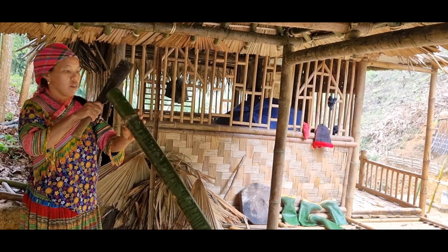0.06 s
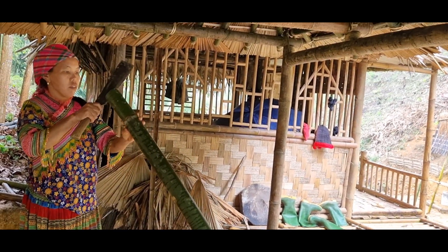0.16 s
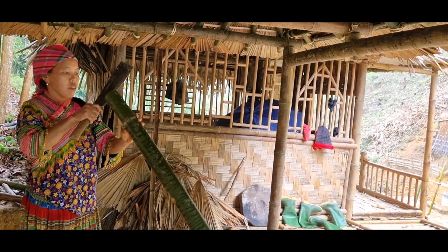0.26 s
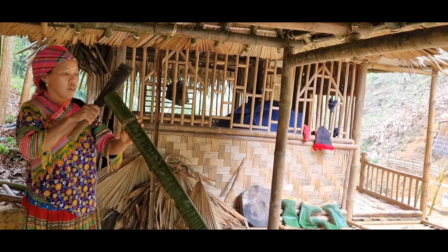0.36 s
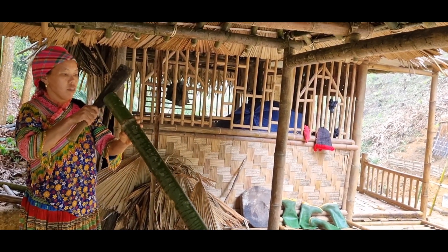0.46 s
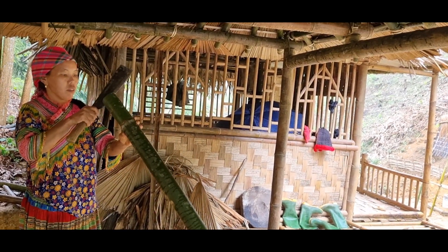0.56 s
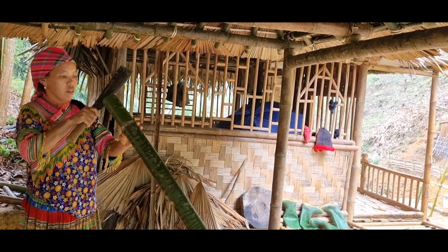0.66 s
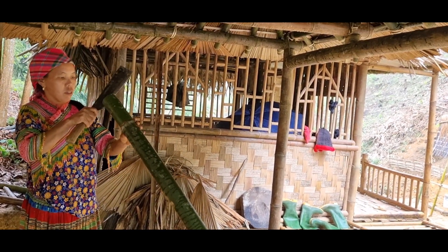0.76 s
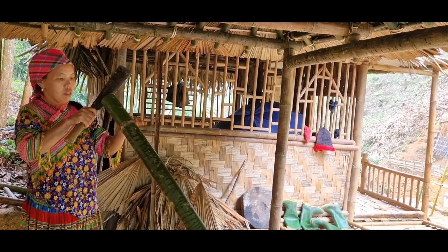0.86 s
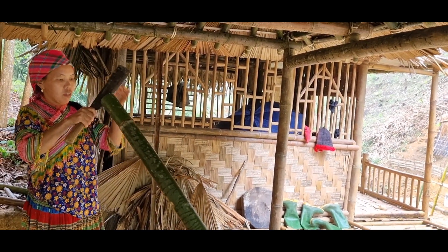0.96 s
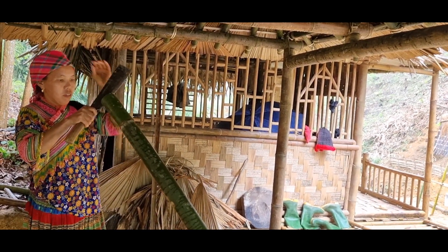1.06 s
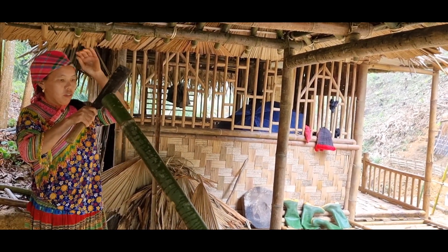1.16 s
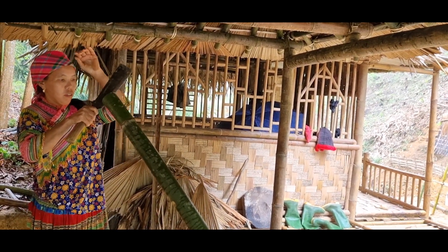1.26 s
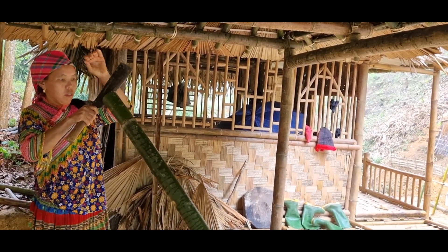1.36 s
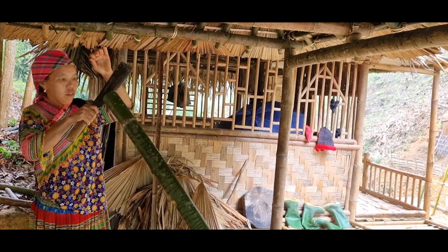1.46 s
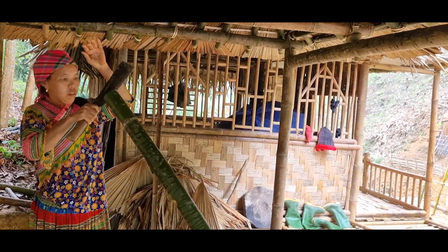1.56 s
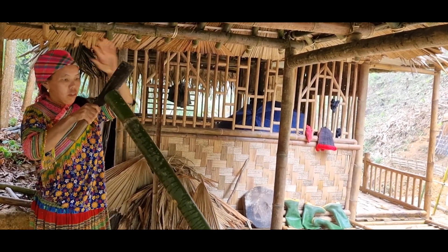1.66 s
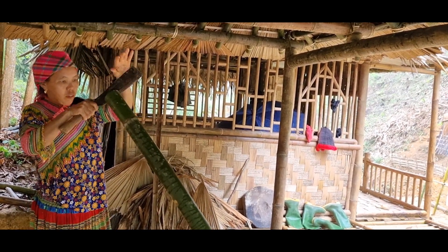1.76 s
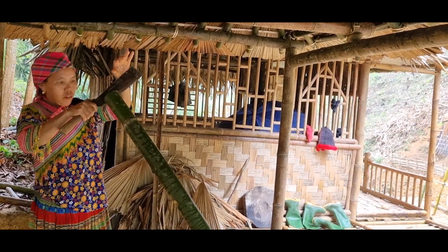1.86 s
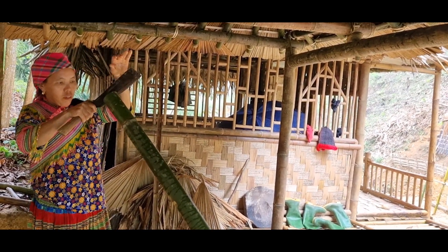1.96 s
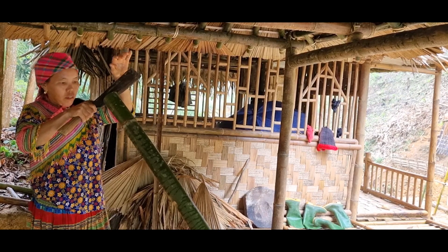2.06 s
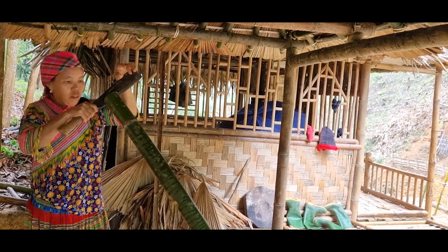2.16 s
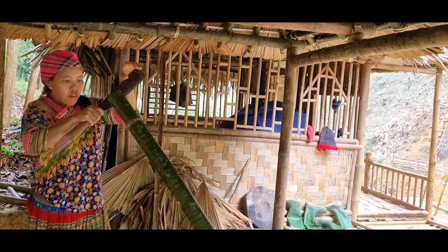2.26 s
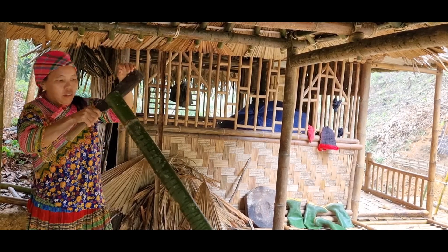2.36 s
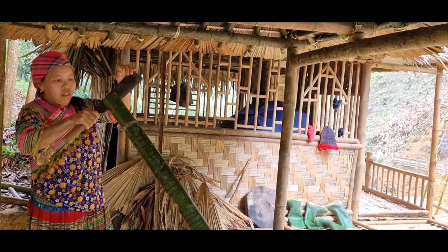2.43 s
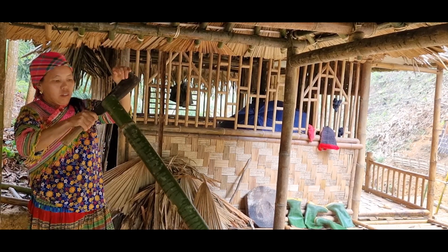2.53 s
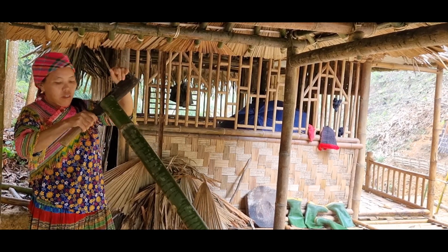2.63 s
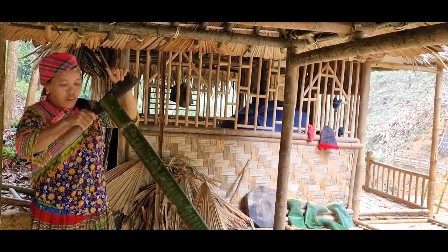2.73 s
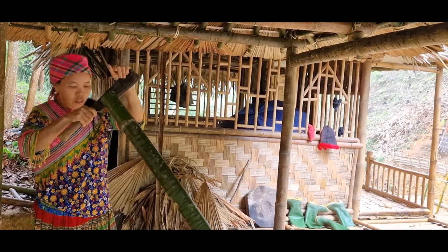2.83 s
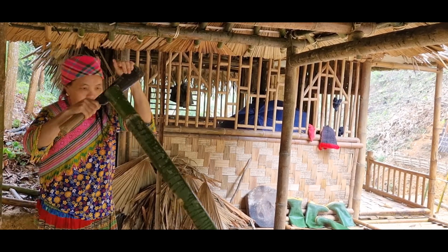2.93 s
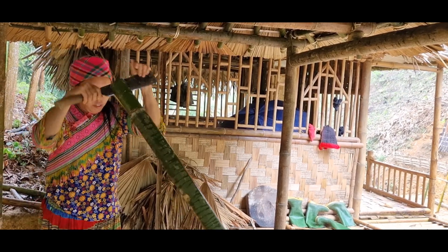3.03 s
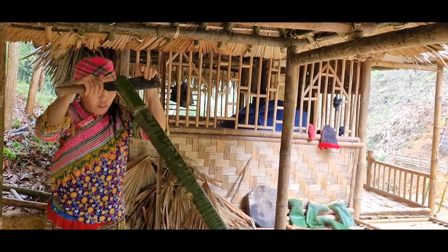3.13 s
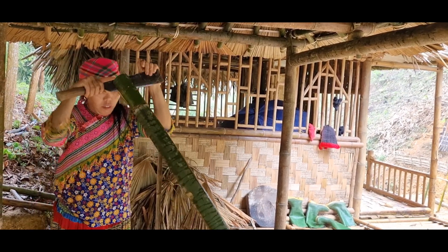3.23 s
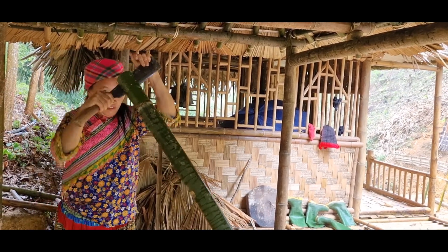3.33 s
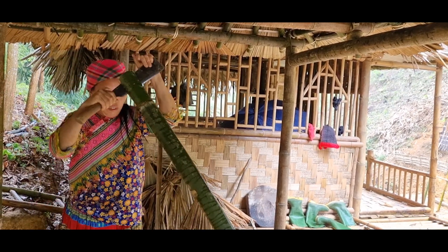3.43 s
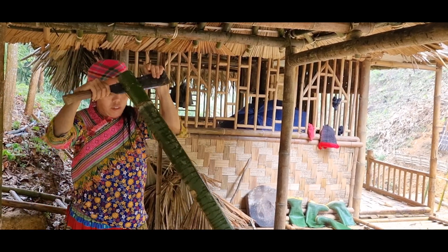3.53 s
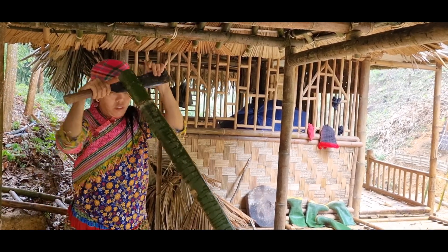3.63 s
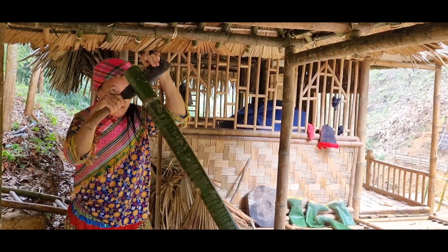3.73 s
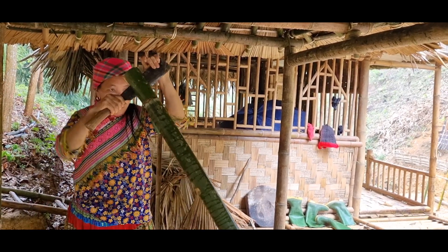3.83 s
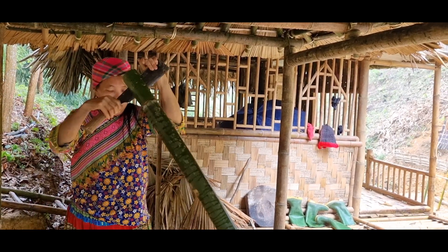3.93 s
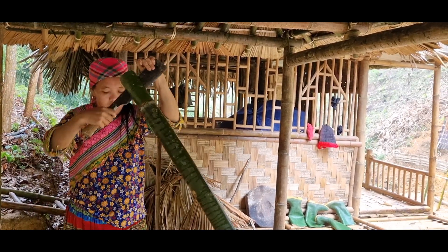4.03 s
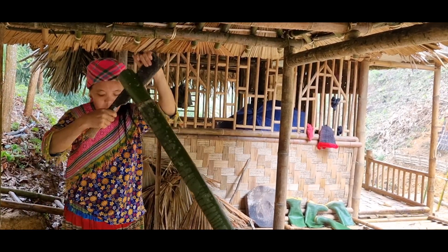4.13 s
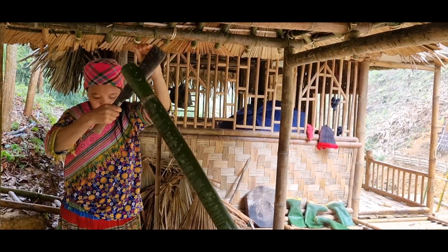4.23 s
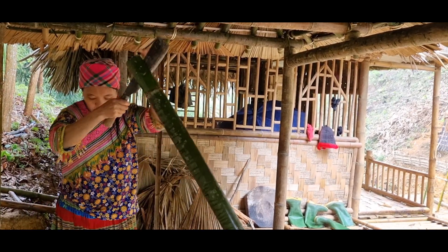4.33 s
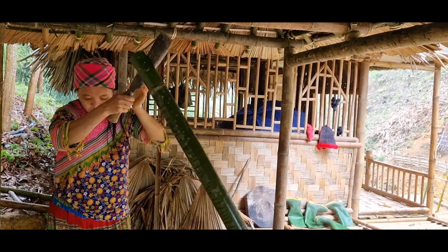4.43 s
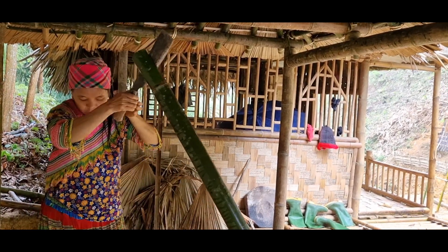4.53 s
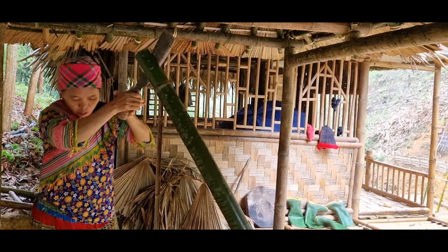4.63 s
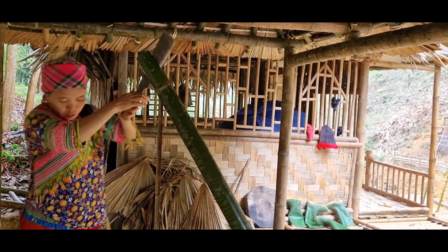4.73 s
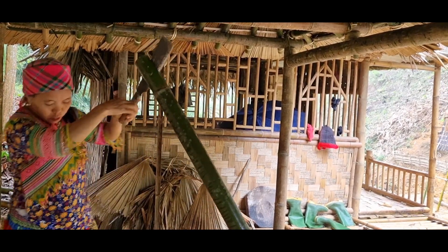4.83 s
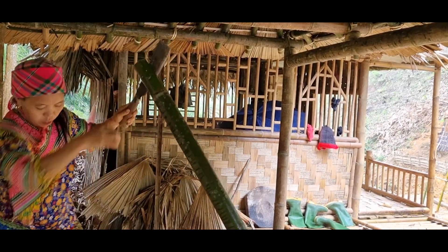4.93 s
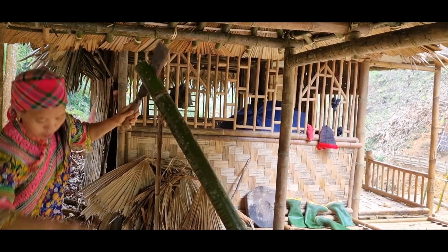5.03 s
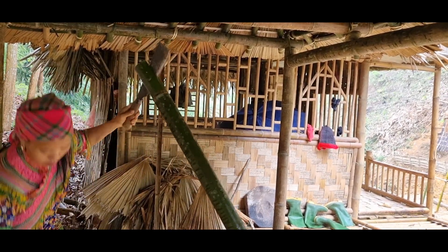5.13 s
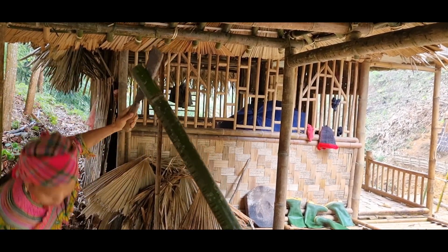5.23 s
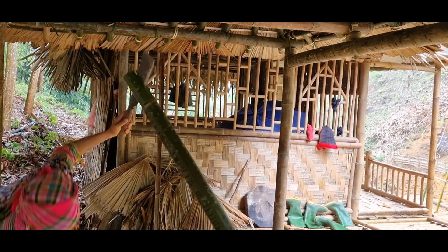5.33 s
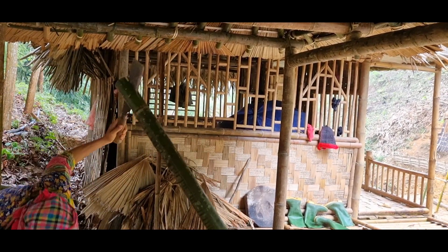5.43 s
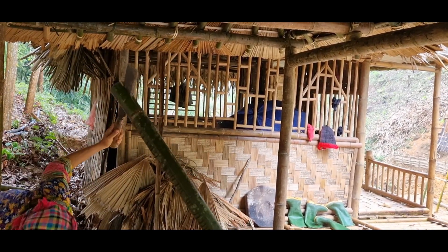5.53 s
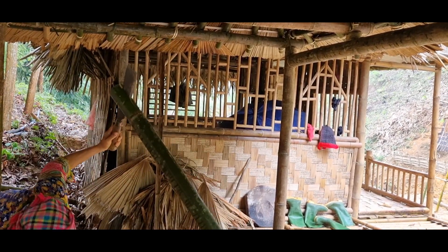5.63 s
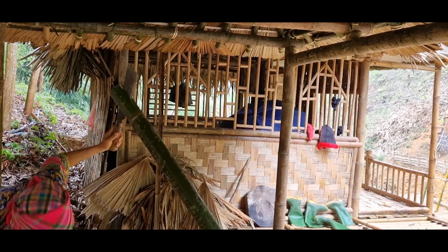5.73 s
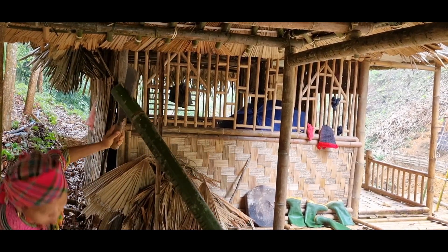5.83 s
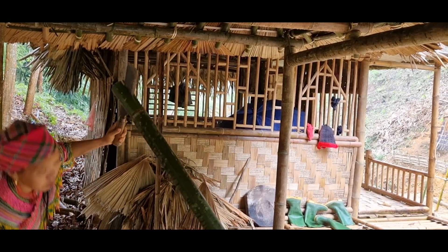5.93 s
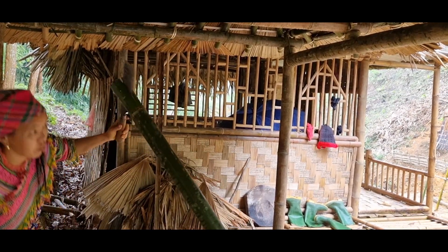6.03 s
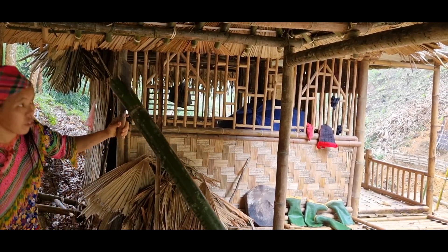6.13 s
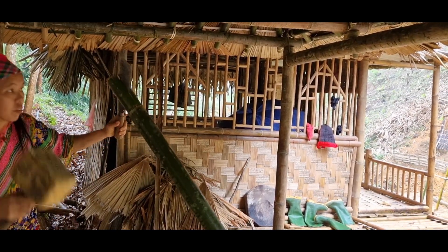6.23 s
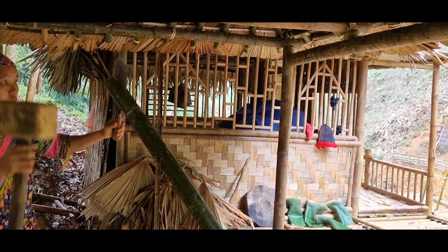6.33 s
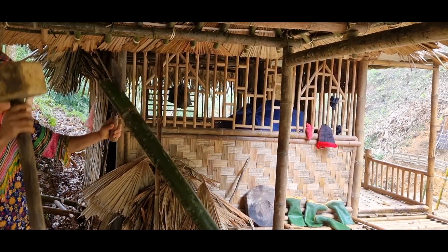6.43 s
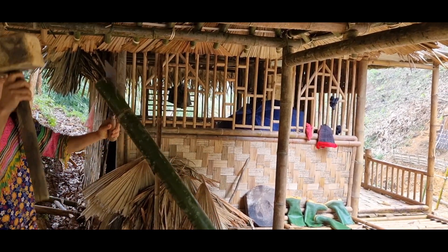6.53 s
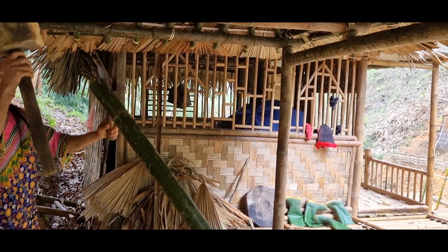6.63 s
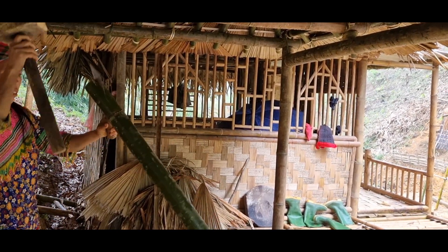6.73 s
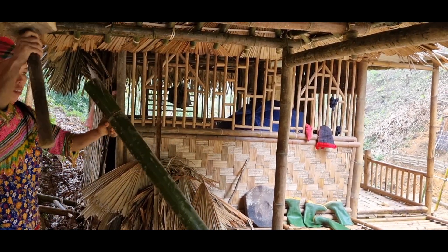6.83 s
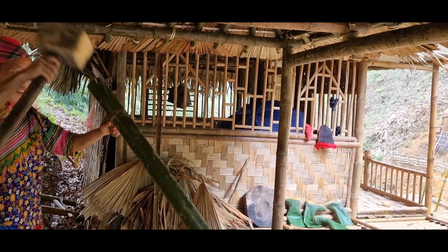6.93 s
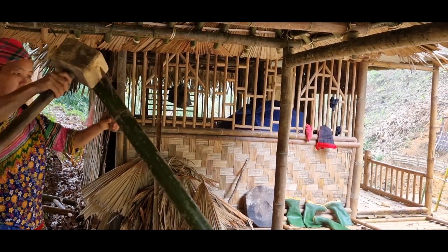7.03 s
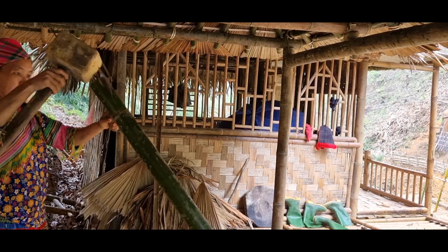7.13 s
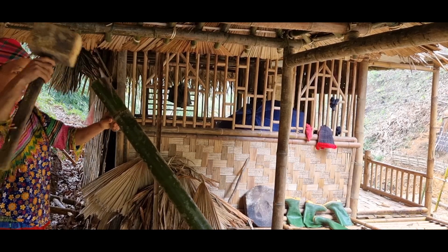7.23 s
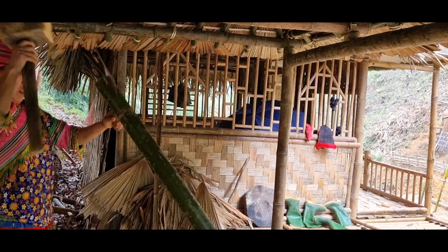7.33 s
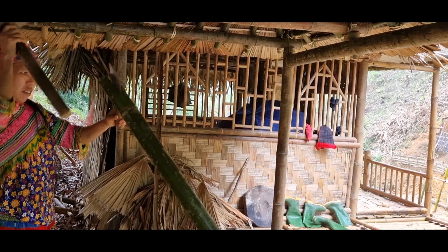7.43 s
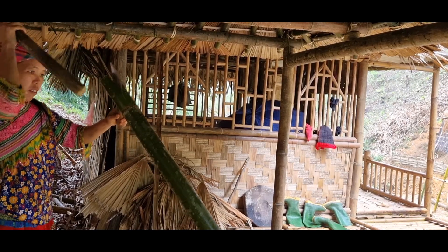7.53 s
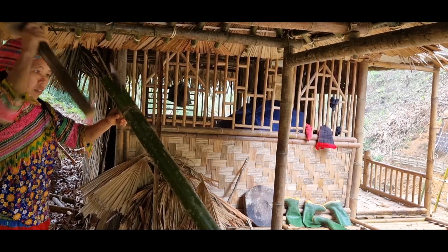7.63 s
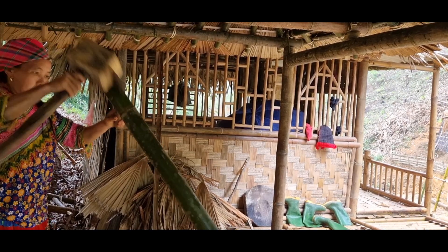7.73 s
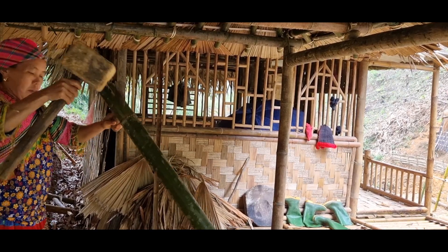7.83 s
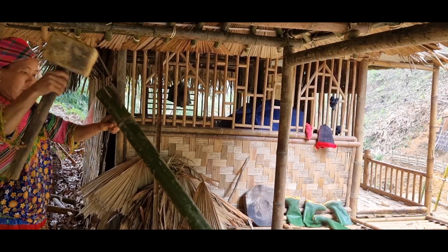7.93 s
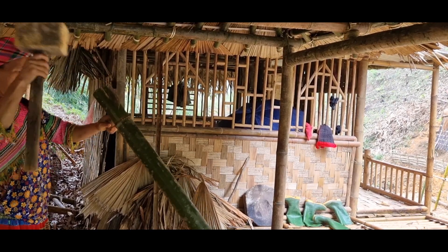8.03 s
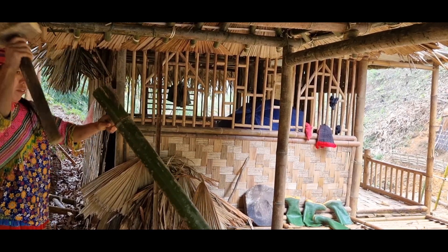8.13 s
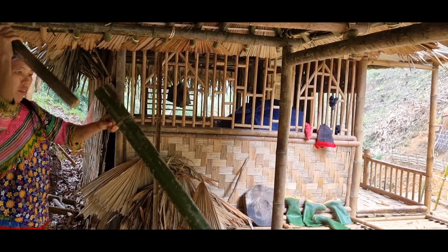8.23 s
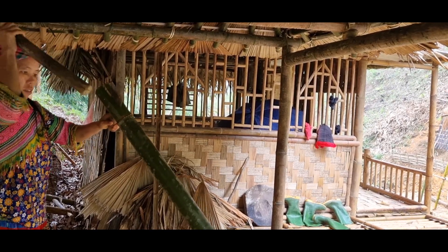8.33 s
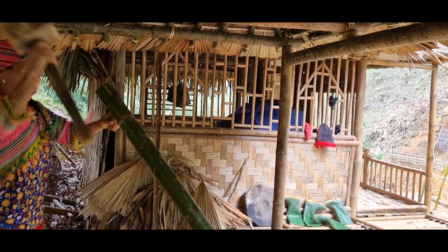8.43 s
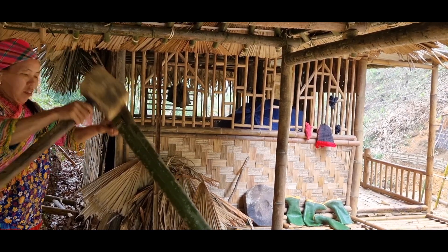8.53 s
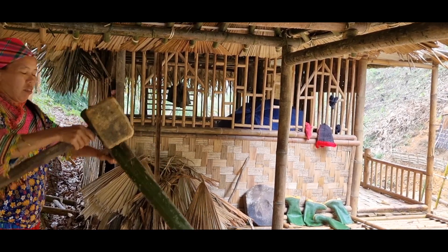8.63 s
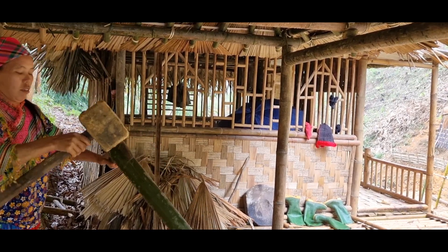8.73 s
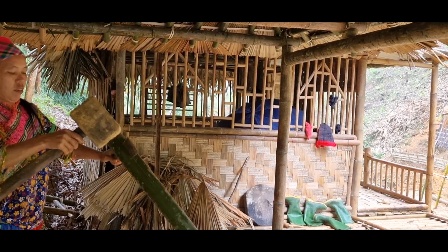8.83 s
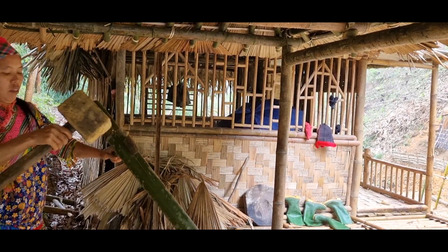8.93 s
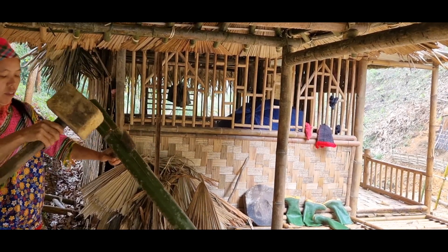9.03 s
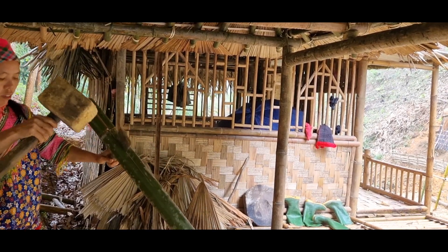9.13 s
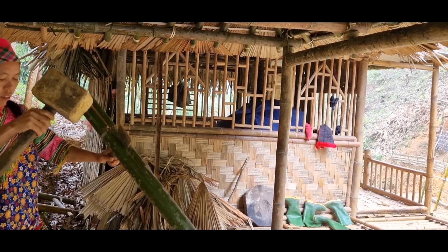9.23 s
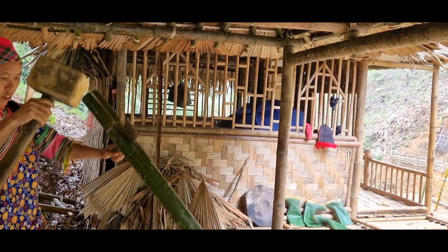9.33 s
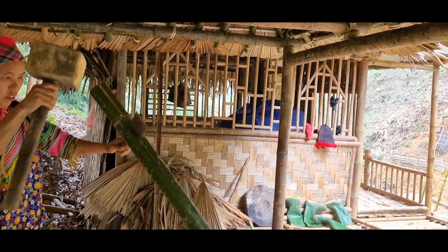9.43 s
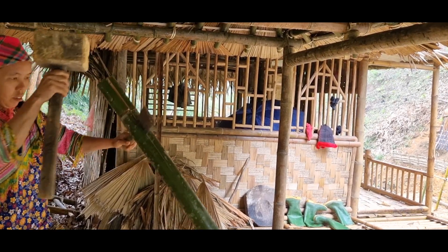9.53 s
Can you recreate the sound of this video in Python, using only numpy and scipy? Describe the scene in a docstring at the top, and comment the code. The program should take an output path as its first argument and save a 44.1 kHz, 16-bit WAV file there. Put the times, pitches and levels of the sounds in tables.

```python
"""Soft air, low rumble and a narrow hiss of distant insects (filtered noise) come first, then feet and small snaps.
A green bamboo pole leaning on the porch of a thatched hut is split with a knife: fibres tear (click runs through
modes), steel squeals and the halves creak (stick-slip tones). Cloth rustles (swelling noise). A wooden mallet then
drives the blade, shaking frame and dry palm leaves (decaying noise), and groans along the pole."""
import sys
import numpy as np
from scipy import signal
from scipy.io import wavfile
from scipy.ndimage import uniform_filter1d

SR = 44100
rng = np.random.default_rng(int(sys.argv[2]) if len(sys.argv) > 2 else 0)


def unload_wav(signal):
    """Save mono or channel-first audio to the path in sys.argv[1] as 16-bit WAV at rate SR, clipped to [-1, 1]."""
    wavfile.write(
        sys.argv[1],
        SR,
        np.round(np.clip(np.atleast_2d(signal).T, -1, 1) * 32767).astype(np.int16),
    )


N = 422478
TIME = np.arange(N) / SR
RING_TIME = TIME[:SR // 3]


def amp(db):
    """Decibels to amplitude gain."""
    return 10 ** (np.asarray(db) / 20)


def unit(x):
    """Scale each channel to energy 1."""
    return x / np.sqrt(np.sum(x ** 2, axis=-1, keepdims=True) + 1e-20)


def at_hz(points, hz):
    """Interpolate a spectrum on a log-frequency axis."""
    f, value = np.transpose(points)
    return np.interp(np.log(hz), np.log(f), value)


def band(x, low_hz, high_hz):
    """Causal Butterworth band-pass."""
    edges_hz = [low_hz, min(high_hz, SR / 2 - 500)]
    return signal.sosfilt(signal.butter(2, edges_hz, "band", fs=SR, output="sos"), x + 1e-18)


def pan(db):
    """Left and right gains for a left-right difference in dB."""
    return amp([[db / 2], [-db / 2]])


def add(out, s, x):
    """Mix a stereo sound in at time s."""
    start = round(s * SR)
    out[:, start:start + x.shape[1]] += x[:, :N - start]


def flutter(per_s, size=N):
    """Random wander: normal draws of spread 1 at per_s knots a second, linear between."""
    return np.interp(TIME[:size] * per_s, np.arange(4000), rng.standard_normal(4000))


def dying(t, t60):
    """Exponential decay, 60 dB in t60 seconds."""
    return np.exp(-np.log(1000) * t / t60)


# Left-right likeness: (f/Hz, correlation)
LIKENESS = [(60, .96), (300, .94), (600, .7), (1100, .25), (2500, .1), (5000, 0), (15000, 0)]


def likeness(hz):
    """Left-right correlation: near 1 in the bass, 0 in the treble."""
    return np.clip(at_hz(LIKENESS, hz), -1, 1)


def noise(spectrum, size, t60=None):
    """Stereo noise in half octaves, alike in the bass; with t60 each band dies at its own pace."""
    out = 0
    edges_hz = 22 * 2 ** np.arange(0, 10, .5)
    white = rng.standard_normal((2, 2, size))
    for k, (low, high) in enumerate(zip(edges_hz, edges_hz[1:])):
        hz = np.sqrt(low * high)
        mid, side = band(white[k % 2], low, high)
        alike = likeness(hz)
        fade = 1 if t60 is None else amp(-60 * TIME[:size] / at_hz(t60, hz))
        stereo = np.sqrt(1 + alike) * mid + np.sqrt(1 - alike) * side * [[1], [-1]]
        out = out + amp(at_hz(spectrum, hz)) * fade * stereo
    return unit(out)


def steady(spectrum):
    """Noise over the whole scene, rms 1 per channel."""
    return noise(spectrum, size=N) * np.sqrt(N)


# Spectra of moving air and low rumble: (f/Hz, relative density/dB per Hz)
AIR = [(25, -15), (90, -3), (150, -7.5), (300, -12.5), (700, -7), (1500, -7.5), (3500, -8), (5000, -10),
       (7500, -9.5), (10000, -20.5), (15000, -14)]
RUMBLE = [(25, -18), (45, -4), (70, -1), (110, -0.5), (170, -16.5), (400, -31)]
# Rumble course: (t/s, level/dB before rumble_db is added)
RUMBLE_LEVEL = [(0.0, -88.5), (2.29, -67.5), (2.48, -77), (3.63, -66.5), (4.16, -77.5), (4.86, -69.5),
                (8.03, -73.5), (8.32, -77.5), (9.58, -76)]
INSECT_HZ, INSECT_WIDTH_HZ = 5587, 440
# initial levels of air and insects; both ebb
AIR_DB, INSECTS_DB, EBB_DB_PER_S = -58.5, -59.5, 0.22


def outdoors(stir_db=1.27, rumble_db=3):
    """Soft moving air, a low rumble and a narrow noise band of distant insects."""
    air = steady(AIR) * amp(AIR_DB + stir_db * flutter(21))
    rumble = steady(RUMBLE) * amp(rumble_db + np.interp(TIME, *np.transpose(RUMBLE_LEVEL)))
    white = rng.standard_normal((2, N))
    chorus = band(white, INSECT_HZ - INSECT_WIDTH_HZ / 2, INSECT_HZ + INSECT_WIDTH_HZ / 2)
    insects = unit(chorus) * np.sqrt(N) * amp(INSECTS_DB)
    return (air + insects) * amp(-EBB_DB_PER_S * TIME) + rumble


# Dense wall modes and near reflections: (f/Hz, relative density/dB per Hz)
SCATTER = [(90, -4), (170, -19), (280, -13), (380, -16), (600, -1), (1400, 0), (2300, -5.5), (4000, -6.5),
           (8000, -7.5), (10500, -20), (15000, -20)]
# their decay: (f/Hz, t60/s)
SCATTER_T60 = [(100, 0.34), (500, 0.072), (1500, 0.089), (4000, .11), (14000, 0.11)]


def porch():
    """Five responses of dense wall modes and near reflections: decaying noise."""
    return [noise(SCATTER, size=len(RING_TIME), t60=SCATTER_T60) for _ in range(5)]


def ringing(modes, vary_db=2.5, detune=.018):
    """Modes with fresh strengths and shifted pitches; the higher ones reach the two ears out of step."""
    out = 0
    for hz, db, t60 in modes:
        skew = np.arccos(likeness(hz)) * rng.choice([-1, 1]) / 2
        pitch_hz = hz * (1 + detune * rng.standard_normal())
        phase = 2 * np.pi * pitch_hz * RING_TIME + skew * np.array([[1], [-1]])
        wave = np.sin(phase) * rng.choice([-1, 1])
        out = out + amp(db + vary_db * rng.standard_normal()) * unit(wave * dying(RING_TIME, t60))
    return unit(out)


def contacts(length, per_s, spread_db, fade_db, rise_s, first_db):
    """A first touch, then uneven clicks that swell as the stroke bites and weaken as it spends itself."""
    t = RING_TIME
    gaps = .5 + rng.exponential(1, len(t)) / 2
    born = np.cumsum(gaps) / per_s
    at = (born[born < min(length, t[-1])] * SR).astype(int)
    size_db = spread_db * np.clip(rng.standard_normal(len(t)), -2, 2)
    strength = amp(size_db) * rng.choice([-1, 1], len(t))
    clicks = np.zeros(len(t))
    clicks[at] = strength[:len(at)]
    clicks *= amp(-fade_db * np.minimum(t / length, 1)) * np.minimum(t / rise_s, 1)
    clicks[0] = amp(first_db)
    return clicks


# Edges of body, middle, edge and sizzle bands [f/Hz]
EDGES_HZ = [170, 500, 2000, 6000, 16000]
# Left-right lean of those four bands [dB, + = left]
LEAN_DB = [2, 0.056, 1.6, -2.9]
BODY_LOSS, SIZZLE_GAIN = 0.25, 1.5  # dB per dB of hardness; the edge rises 1 dB per dB


def strokes(table, colour_db, scatter, per_s, spread_db, fade_db, rise_s, first_db, direct_db,
            modes=None, modes_db=0):
    """Contact runs heard directly, through modes and off the porch; hardness sets the colour."""
    out = np.zeros((2, N))
    body_db, edge_db, sizzle_db = colour_db
    for s, length, db, hard_db in table:
        response = scatter[rng.integers(len(scatter))].copy()
        if modes:
            response += amp(modes_db) * ringing(modes)
        response[:, 0] += amp(direct_db)
        clicks = contacts(length, per_s, spread_db, fade_db, rise_s, first_db)
        sound = signal.fftconvolve(clicks[None], response, axes=1)
        bands_db = (body_db - BODY_LOSS * hard_db, 0, edge_db + hard_db, sizzle_db + SIZZLE_GAIN * hard_db)
        for low, high, band_db, lean_db in zip(EDGES_HZ, EDGES_HZ[1:], bands_db, LEAN_DB):
            part = unit(band(band(sound, low, high), low, high))
            add(out, s, part * amp(db + band_db) * np.sqrt(length * SR) * pan(lean_db))
    return out


# Feet and hands shift: (t/s, length/s, level/dB at 500-2000 Hz, hardness/dB)
SCUFFS = [(.112, 0.018, -55.5, -4), (1.987, 0.039, -51, -6), (4.385, 0.024, -60, 9),
          (4.831, 0.036, -46, -8), (5.055, 0.023, -46.5, -1.5), (5.09, 0.066, -47.5, 2.5),
          (5.347, .023, -47, 2), (5.483, .038, -51, -1.5), (6.246, 0.011, -46.5, 7.5)]
# (body, edge, sizzle) [dB re 500-2000 Hz, at hardness 0]
SCUFF_COLOUR_DB = (-14, -6, -11)


def scuffs(scatter):
    """Feet and hands shift: sparse contacts, no modes."""
    return strokes(SCUFFS, SCUFF_COLOUR_DB, scatter, per_s=900, spread_db=2.0, fade_db=6.5,
                   rise_s=.0024, first_db=8.0, direct_db=-9.5)


# Small dry snaps: (t/s, peak/dB before panning, centre f/Hz, left-right/dB)
SNAPS = [(.38, -40, 4300, -5), (.619, -14.5, 2610, -1), (.71, -38.5, 1940, 4), (.764, -22.5, 2580, -7.5),
         (.849, -31.5, 7640, -8), (.896, -36.5, 2500, -3), (1.109, -35, 1730, 3), (1.463, -30, 2200, 2.5),
         (2.537, -32.5, 6900, -1), (3.904, -27, 2870, 3.5), (4.698, -31.5, 1700, 4),
         (6.428, -21.5, 2040, 1), (6.453, -36, 1887, 4.5), (6.509, -26.5, 2000, 2), (6.53, -24, 2430, -0.5),
         (6.555, -33, 1670, 2), (7.306, -36, 8400, 1.5)]
# Modes of a thin bamboo strip: (f/Hz, level/dB, t60/s)
STRIP = [(503, -8.5, 0.013), (1058.5, 2.5, 0.063), (2010, -3, 0.01), (2605, -8.5, 0.029),
         (3200, -10.5, 0.019), (4530, 3.5, 0.015), (7610, -2, 0.089)]


def snaps(scatter, crack_t60=0.01, ring_db=-2, porch_db=-15, width=1.33, skirt_db=-12):
    """Single fibres and twigs give way: a very short noise crack and a ring of strip modes."""
    out = np.zeros((2, N))
    size = len(RING_TIME)
    for s, db, hz, lean_db in SNAPS:
        white = rng.standard_normal((2, size)) + rng.standard_normal(size) / 2
        crack = unit(white * dying(RING_TIME, crack_t60))
        ring = amp(ring_db) * ringing(STRIP, vary_db=7.0, detune=0.011)
        sound = crack + ring + amp(porch_db) * scatter[rng.integers(len(scatter))]
        sound = unit(band(sound, hz / width, hz * width) + amp(skirt_db) * band(sound, 300, 8000))
        add(out, s, sound / np.abs(sound).max() * amp(db) * pan(lean_db))
    return out


# The cleft runs on: (t/s, length/s, level/dB at 500-2000 Hz, hardness/dB)
SPLITS = [(1.79, 0.042, -28.5, 4), (1.836, 0.0071, -22.5, -0.5), (2.355, 0.028, -45, 5.5),
          (3.068, 0.0067, -34.5, 1.5), (3.105, .04, -42, 1), (3.141, 0.018, -21, -8.5),
          (3.161, 0.042, -19, -4), (3.331, 0.034, -32, 6), (3.37, 0.038, -35, 2.5), (3.415, 0.036, -26, -5),
          (3.542, 0.037, -50, 5.5), (3.568, 0.048, -42, 3), (3.748, 0.012, -24.5, 2.5),
          (3.764, 0.065, -31.5, 1), (3.83, 0.0069, -27, -8), (7.9432, .014, -17.5, 2.5)]
# (body, edge, sizzle) [dB re 500-2000 Hz, at hardness 0]
SPLIT_COLOUR_DB = (-19, -0.5, -5)
# Modes of the pole, also used by blows: (f/Hz, level/dB, t60/s)
POLE = [(257, -14.5, 0.23), (312.5, -10, 0.16), (472, -7, 0.08), (560, -14.5, 0.066), (667, 1, 0.052),
        (728.3, -6, 0.2), (807, 0, 0.13), (970, -7, 0.092), (1020, -3, 0.12), (1306, 1, .12),
        (1447, -1, 0.11), (1647, 1.5, 0.048), (2010, 3.5, 0.031), (2780, -17.5, 0.11), (2960, -18.5, 0.091),
        (3517, 0.5, 0.096), (3790, -5.5, .14), (4400, -17, .09), (7320, -5, .1)]


def splits(scatter):
    """Fibres tear as the cleft runs on: dense clicks through the pole's modes."""
    return strokes(SPLITS, SPLIT_COLOUR_DB, scatter, per_s=2200, spread_db=4.5, fade_db=6.5,
                   rise_s=0.0011, first_db=-4.5, direct_db=-12.5, modes=POLE, modes_db=-6.5)


# Jolts reaching the hut: (t/s, thud level/dB, leaves level/dB, leaves t60/s), levels before rise and decay
JOLTS = [(1.80, -46.5, -42.5, 0.58), (2.346, -50, -33, 0.17), (3.16, -58.5, -49, .98),
         (3.42, -59, -48.5, 1), (3.759, -54.5, -38.5, 0.77), (7.069, -41, -40.5, 0.67),
         (7.845, -35, -25.5, 0.37), (7.95, -66.5, -35, 0.4), (8.628, -36.5, -23.5, 0.5)]
# Spectra of frame and dry leaves: (f/Hz, relative density/dB per Hz)
FRAME = [(25, -27), (40, -8), (54, 1), (85, -8.5), (130, -12), (250, -18), (600, -46.5)]
LEAVES = [(200, -8), (800, 1.5), (2500, 0), (4200, 0.5), (8000, -4.5), (11000, -9.5), (15000, -8)]


def hut(frame_t60=0.3, rise_s=0.0061, crackle_db=2.0):
    """Each jolt sets the frame thudding and the dry palm leaves shivering: decaying noise."""
    thud, shiver = np.zeros(N), np.zeros(N)
    for s, thud_db, leaves_db, leaves_t60 in JOLTS:
        age = np.maximum(TIME - s, 0)
        rise = 1 - np.exp(-age / rise_s)
        thud += amp(thud_db) * rise * dying(age, frame_t60)
        shiver += amp(leaves_db) * rise * dying(age, leaves_t60)
    return thud * steady(FRAME) + shiver * amp(crackle_db * flutter(300)) * steady(LEAVES)


# Blade drags in the cleft: (t/s, length/s, level/dB at 500-2000 Hz, hardness/dB)
SCRAPES = [(2.717, 0.0087, -34, 0), (2.738, .035, -44, 0.014), (2.773, .085, -41, 0),
           (2.845, 0.093, -47, 0.45)]
# (body, edge, sizzle) [dB re 500-2000 Hz, at hardness 0]
SCRAPE_COLOUR_DB = (-20.5, -11.5, -21.5)
# Modes of the pinched blade: (f/Hz, level/dB, t60/s)
BLADE = [(770, -12.5, 0.075), (1063, -6.5, 0.058), (1350, -1.5, 0.028), (1583, -5.5, 0.03),
         (3270, -20, 0.3), (4530, -7.5, 0.156), (5517, -10.5, 0.18)]


def scrapes(scatter):
    """The blade drags in the cleft: near-even clicks through the pinched blade's modes."""
    return strokes(SCRAPES, SCRAPE_COLOUR_DB, scatter, per_s=1600, spread_db=0.5, fade_db=9.5,
                   rise_s=.00078, first_db=9, direct_db=-11, modes=BLADE, modes_db=4.5)


# Dull bumps of feet and mallet handle: (t/s, length/s, level/dB at 500-2000 Hz, hardness/dB)
BUMPS = [(3.006, 0.018, -57, -9), (4.982, .012, -46, -7.5), (5.035, 0.0072, -49.5, -1),
         (5.235, 0.0075, -46.5, 4), (6.62, 0.01, -42, 1), (6.70, .01, -57, -2), (8.171, .0089, -47, 3)]
# (body, edge, sizzle) [dB re 500-2000 Hz, at hardness 0]
BUMP_COLOUR_DB = (-2, -5.5, -9.5)


def bumps(scatter):
    """Dull bumps of feet and of the mallet's handle: a strong first touch, no modes."""
    return strokes(BUMPS, BUMP_COLOUR_DB, scatter, per_s=2500, spread_db=3.0, fade_db=3.5,
                   rise_s=.0024, first_db=15.5, direct_db=-7.5)


RING_ON_DB, RING_ON_T60 = -28, .25  # faint ring-on of the pole after each push


def stick_slip(table, scatter, attack_s, release_t60, sag_per_s, slope_db, jitter, shake_db, porch_db):
    """Friction tones: uneven slips, half orders when they alternate; each push swells, sags in pitch, dies."""
    out, t = np.zeros((2, N)), RING_TIME
    for s, length, hz, db, half_db in table:
        rate_hz = hz * (1 - sag_per_s * np.minimum(t, length)) * (1 + jitter * flutter(500, size=len(t)))
        phase = 2 * np.pi * np.cumsum(rate_hz) / SR
        tone = 0
        for k in range(1, 5):
            tone = tone + amp(slope_db * np.log2(k)) * np.sin(k * phase)
            tone = tone + amp(half_db) / k * np.sin((k - .5) * phase)
        reflected = unit(signal.fftconvolve(tone[None], scatter[0], axes=1)[:, :len(t)])
        heard = unit(tone) + amp(porch_db) * reflected
        # level out, so that the push alone shapes the loudness
        even = heard / np.sqrt(uniform_filter1d(np.mean(heard ** 2, axis=0), size=300) + 1e-12)
        after = np.maximum(t - length, 0)
        release = np.maximum(dying(after, release_t60), amp(RING_ON_DB) * dying(after, RING_ON_T60))
        push = np.minimum(t / attack_s, 1) * release
        add(out, s, even * push * amp(db + shake_db * flutter(250, size=len(t))))
    return out


# Steel pushes: (t/s, length/s, f/Hz, level/dB before panning, half orders/dB)
SQUEALS = [(3.333, 0.019, 2134, -26.5, -25.5), (3.367, 0.018, 2120, -17.5, -23),
           (3.385, 0.013, 2185, -19.5, -4.5), (3.404, 0.024, 2110, -11.5, -23.5),
           (3.433, 0.024, 2100, -18.5, -27)]


def squeals(scatter):
    """Steel squeals in the cleft: stick-slip with weak overtones, left of centre."""
    tones = stick_slip(SQUEALS, scatter, attack_s=0.0064, release_t60=0.042, sag_per_s=0.44,
                       slope_db=-23, jitter=.016, shake_db=2.0, porch_db=-7)
    return tones * pan(4.9)


# Creak pushes: (t/s, length/s, f/Hz, level/dB before filtering, half orders/dB)
CREAKS = [(3.752, 0.043, 1049, -13.5, 9.5), (3.797, 0.027, 1014, -14.5, 2)]


def creaks(scatter):
    """The halves creak apart: stick-slip rich in overtones, the fundamental held down."""
    tones = stick_slip(CREAKS, scatter, attack_s=.008, release_t60=.035, sag_per_s=0.68,
                       slope_db=-1, jitter=.014, shake_db=3, porch_db=2)
    return band(tones, 2150, 3600) + amp(-13) * band(tones, 770, 1120)


# Reaching, stooping, lifting: (middle t/s, half length/s, level/dB before the swish is added)
MOVES = [(4.3, .3, -63), (5.177, .2, -55), (6.25, .55, -60.5)]


def clothes(grain_db=1.5, swish_db=-4):
    """Cloth brushes on cloth: uneven fine hiss and soft swish, swelling and ebbing with each move."""
    speed = sum(amp(db) * np.exp(-((TIME - s) / half_length) ** 2) for s, half_length, db in MOVES)
    white = rng.standard_normal((2, N))
    cloth = unit(band(white, 4700, 18000)) + amp(swish_db) * unit(band(white, 400, 4000))
    return cloth * np.sqrt(N) * speed * amp(grain_db * flutter(90))


# Mallet drives the blade: (t/s, length/s, level/dB at 500-2000 Hz, hardness/dB)
BLOWS = [(7.068, 0.0051, -9, 1.5), (7.841, 0.0094, -8.5, 0), (8.620, 0.049, -15, 5),
         (8.681, 0.0097, -13, -9.5)]
# (body, edge, sizzle) [dB re 500-2000 Hz, at hardness 0]
BLOW_COLOUR_DB = (-10, -7.5, -13)


def blows(scatter):
    """The mallet drives the blade down: hard uneven clicks through the pole's modes."""
    return strokes(BLOWS, BLOW_COLOUR_DB, scatter, per_s=2200, spread_db=6, fade_db=8,
                   rise_s=0.0012, first_db=7.5, direct_db=-12, modes=POLE, modes_db=-8.5)


# Mallet head slides on the pole: (t/s, length/s, level/dB at 500-2000 Hz, hardness/dB)
RUBS = [(8.824, .031, -35.5, -2), (9.044, 0.042, -42, 2.5), (9.08, .062, -44, 2.5), (9.155, .14, -44, -2.5),
        (9.284, .006, -38, -21), (9.331, 0.0027, -41.5, -5)]
# (body, edge, sizzle) [dB re 500-2000 Hz, at hardness 0]
RUB_COLOUR_DB = (-15, -5, -16)
# Modes of the mallet on the pole: (f/Hz, level/dB, t60/s)
MALLET = [(318, -24, 0.2), (554, -3.5, 0.078), (708, 2.5, 0.087), (830, 0, 0.047), (1370, -11, 0.23),
          (1930, -3.5, 0.089), (3290, -3.5, 0.046)]


def rubs(scatter):
    """The mallet head slides on the pole: equal clicks, fading, through the mallet's modes."""
    return strokes(RUBS, RUB_COLOUR_DB, scatter, per_s=1100, spread_db=0.0, fade_db=7.5,
                   rise_s=0.0016, first_db=8.5, direct_db=-12, modes=MALLET, modes_db=2.5)


# Groan pushes: (t/s, length/s, f/Hz, level/dB before filtering, half orders/dB)
GROANS = [(8.826, 0.032, 676, -34.5, -18), (9.079, 0.042, 657, -30.5, -9.5), (9.142, 0.014, 579, -40.5, -6),
          (9.165, 0.014, 633, -38, -10), (9.2, 0.084, 596, -44.5, 3)]


def groans(scatter):
    """The mallet groans on the pole's skin: low stick-slip tones."""
    tones = stick_slip(GROANS, scatter, attack_s=0.0088, release_t60=.08, sag_per_s=0.22,
                       slope_db=-10, jitter=0.022, shake_db=1.5, porch_db=1)
    return band(tones, 240, 3900)


def scene():
    """All the work on the pole, in front of the hut."""
    scatter = porch()
    ground = outdoors() + scuffs(scatter) + bumps(scatter) + clothes()
    cleft = snaps(scatter) + splits(scatter) + scrapes(scatter) + squeals(scatter) + creaks(scatter)
    mallet = blows(scatter) + rubs(scatter) + groans(scatter)
    return ground + cleft + mallet + hut()


def lag(x, time_s):
    """One-pole smoothing."""
    r = np.exp(-1 / (time_s * SR))
    return signal.lfilter([1 - r], [1, -r], x)


GAIN_KNEE_DB, GAIN_ATTACK_S, GAIN_RELEASE_S = -24.5, 0.31, 0.78  # the two lags act in series
CUTOFF_HZ = 15700


def record(dry):
    """Cut the deepest rumble, sink the gain slowly after loud sounds, round peaks, cut the top."""
    lean = signal.sosfilt(signal.butter(3, 36, "high", fs=SR, output="sos"), dry)
    power = lag(lag(np.mean(lean ** 2, axis=0), GAIN_ATTACK_S), GAIN_RELEASE_S)
    held = lean / np.sqrt(1 + power / amp(GAIN_KNEE_DB) ** 2)
    rounded = 1.2 * np.tanh(held / 1.2)
    return signal.sosfilt(signal.ellip(10, .1, 80, CUTOFF_HZ, fs=SR, output="sos"), rounded)


dry = scene()
out = record(dry)
unload_wav(out)
```